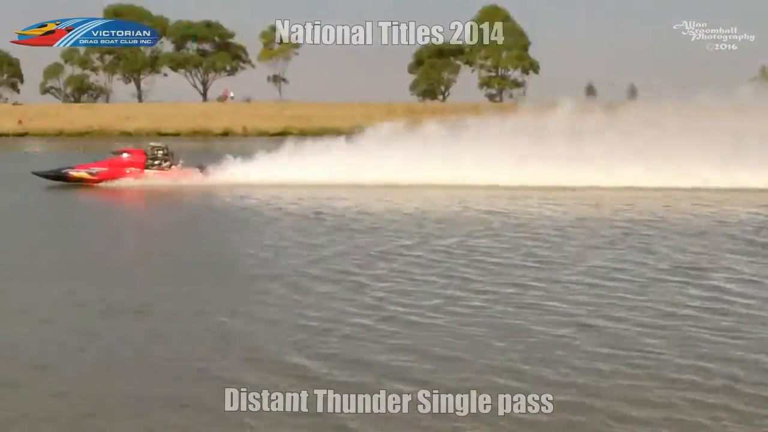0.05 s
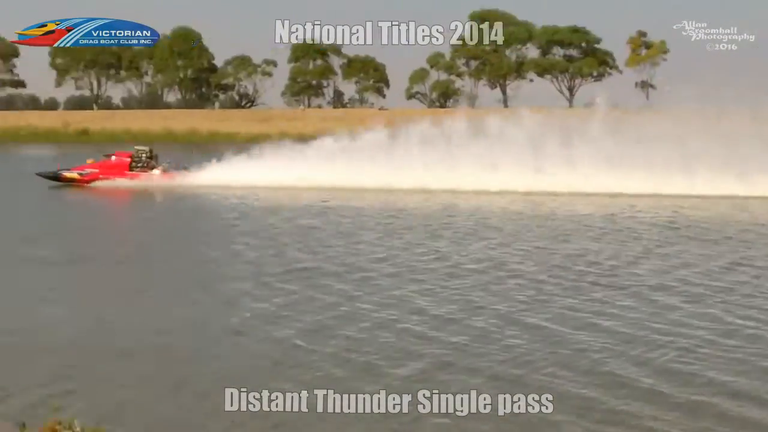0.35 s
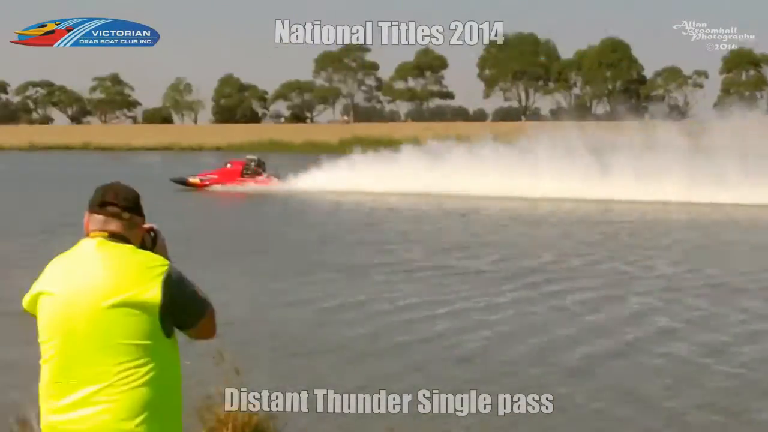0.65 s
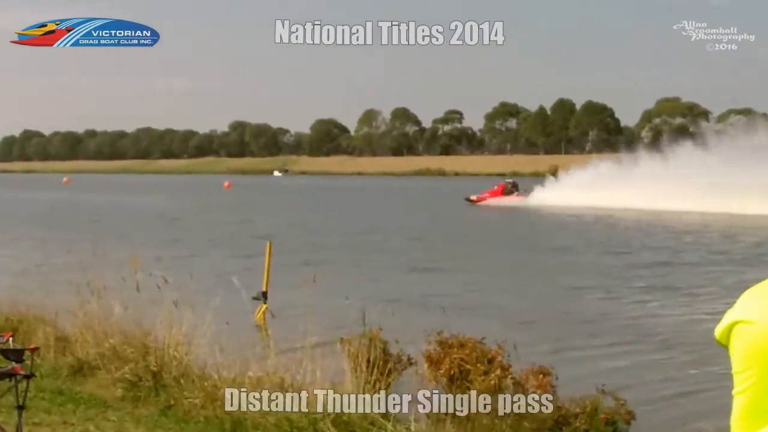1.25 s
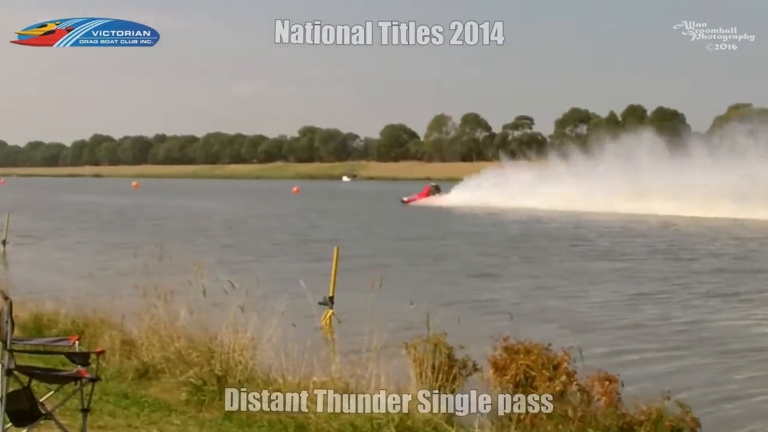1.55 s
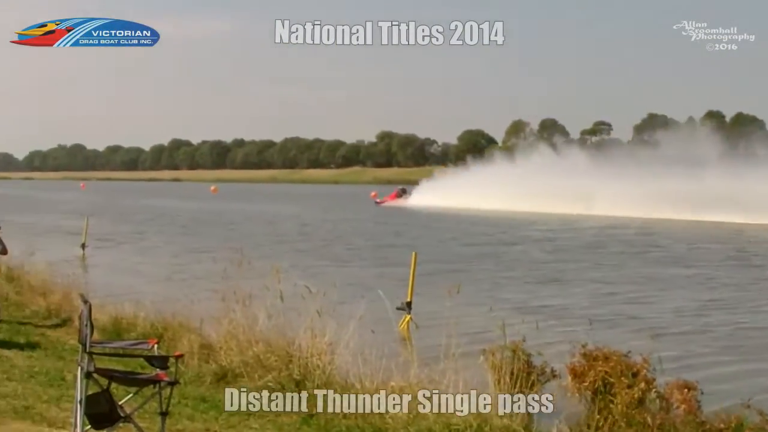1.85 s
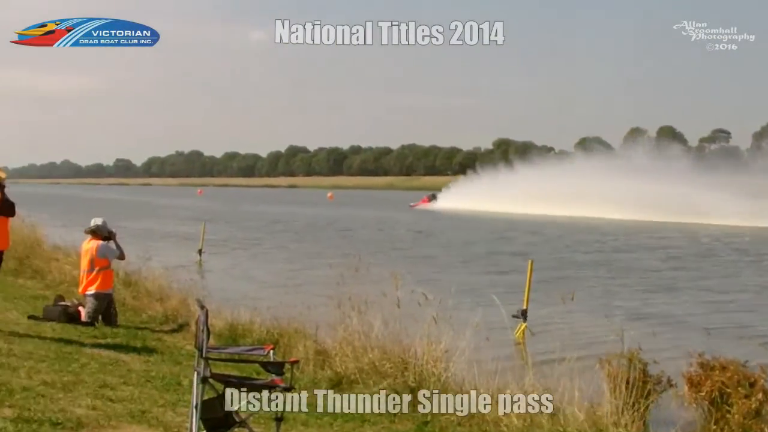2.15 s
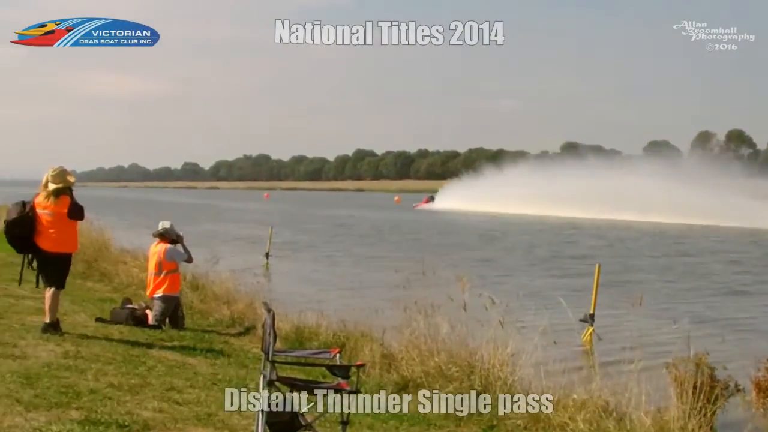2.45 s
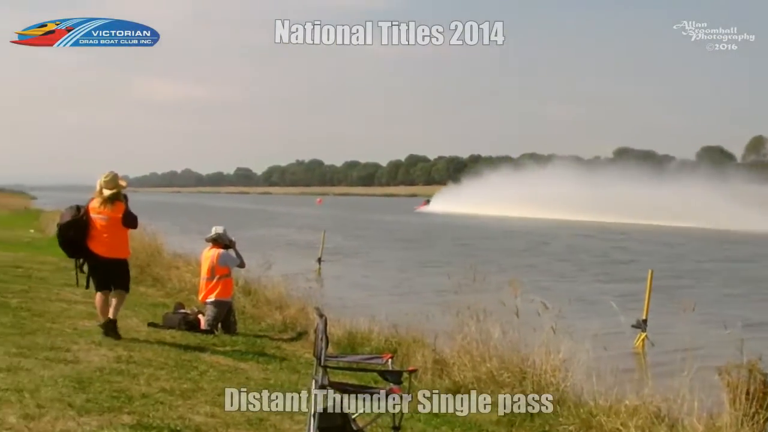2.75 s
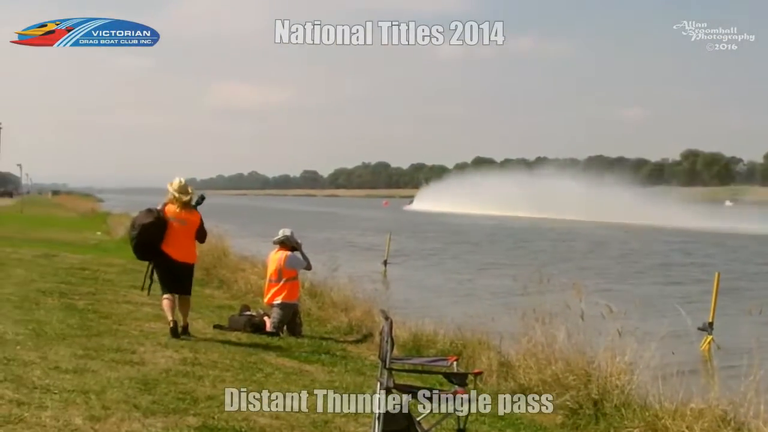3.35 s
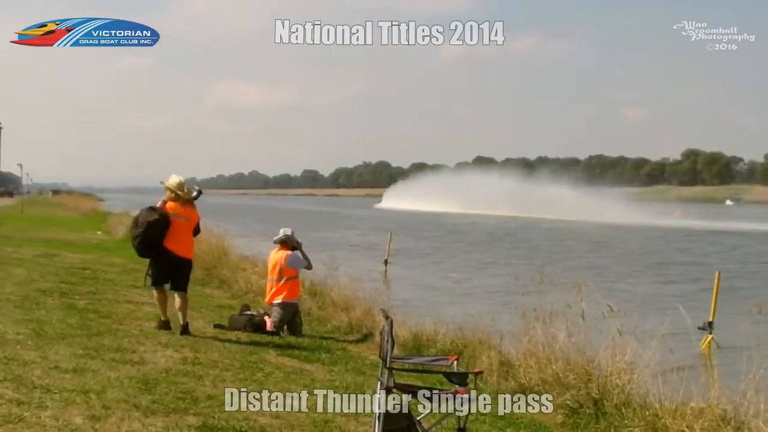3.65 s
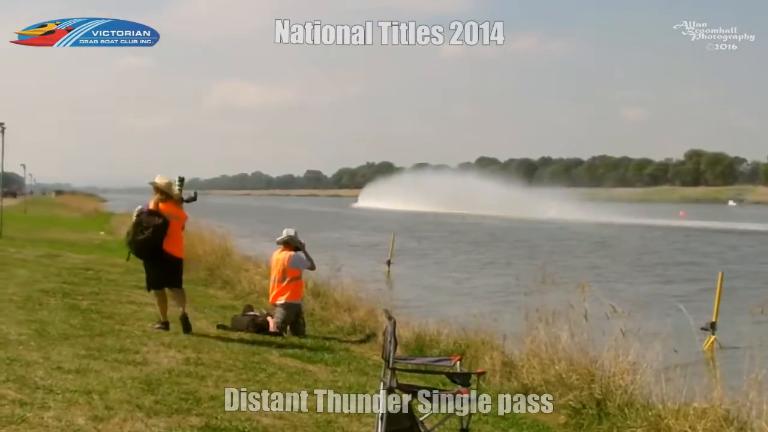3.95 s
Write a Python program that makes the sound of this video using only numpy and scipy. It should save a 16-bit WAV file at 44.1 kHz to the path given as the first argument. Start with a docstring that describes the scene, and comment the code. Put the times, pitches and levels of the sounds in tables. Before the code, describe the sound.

A racing boat's engine roars past at full throttle, its exhaust crackling over a steady hiss of spray. The firing turns ragged, the revs drop, and the sound dulls to a throb as it moves away across open water.

```python
"""A racing boat's V8 runs flat out along a wide waterway, over hissing spray and a faint rumble of air.
In each engine cycle the open exhausts fire four uneven shock pulses from the near cylinders and four
weak ones from the far side. Swirling gas trails each pulse, the shocks crackle and the shore echoes.
Around 1.5 s the firing turns ragged, and at 1.75 s the revs drop.
Then the boat draws away, and its crackle dulls to a throb."""
import sys
import numpy as np
from scipy import signal
from scipy.fft import rfft, irfft, next_fast_len
from scipy.io import wavfile
from scipy.ndimage import uniform_filter1d, minimum_filter1d, map_coordinates

SR = 44100
rng = np.random.default_rng(int(sys.argv[2]) if len(sys.argv) > 2 else 0)


def digitize_waveform(pressure):
    """Quantize a signal to 16-bit integers and store it at the path in sys.argv[1].

    Rows of a 2-D input are taken as channels; values are limited to [-1, 1].
    """
    field = np.atleast_2d(pressure).T
    bounded = np.clip(field, -1, 1)
    quanta = np.round(bounded * 32767).astype(np.int16)
    wavfile.write(sys.argv[1], SR, quanta)


N = 176400
T = np.arange(N) / SR
FFT_SIZE = next_fast_len(N + SR)
HZ = np.fft.rfftfreq(FFT_SIZE, 1 / SR)


def amp(db):
    """Turn decibels into a gain."""
    return 10 ** (np.asarray(db) / 20)

def unit(x):
    """Scale a sound to an average (rms) level of 1."""
    return x / np.sqrt(np.mean(x ** 2) + 1e-20)

def over_pitch(points, hz=HZ):
    """Join (frequency, value) points along a log frequency axis."""
    freqs, values = np.transpose(points)
    return np.interp(np.log(hz + 1), np.log(freqs + 1), values)

def over_time(points):
    """Join (time, value) points into one value per sample."""
    return np.interp(T, *np.transpose(points))

def ramp(t, at_s, length_s):
    """Rise from 0 to 1 around a moment."""
    return np.clip((t - at_s) / length_s + .5, 0, 1)

def wobble(per_s):
    """A smooth curve through per_s random values a second."""
    return map_coordinates(rng.standard_normal(int(T[-1] * per_s) + 4), [T * per_s])

def filtered(x, response):
    """Give each frequency of a sound its own gain."""
    return irfft(rfft(x, FFT_SIZE) * response, FFT_SIZE)[..., :N]

def below(hz, order=8):
    """A smooth filter that keeps what lies below hz."""
    return 1 / (1 + (HZ / hz) ** order)

def tone_filter(colour):
    """A filter of this colour that rings only after a pulse, never before (minimum phase)."""
    gain = np.maximum(amp(over_pitch(colour)), .0004)
    cepstrum = irfft(np.log(gain), FFT_SIZE)
    cepstrum[1:FFT_SIZE // 2] *= 2
    cepstrum[FFT_SIZE // 2 + 1:] = 0
    return np.exp(rfft(cepstrum))

def pulses(times, sizes):
    """Clean clicks that can fall between samples."""
    at = times[:, None] * SR
    taps = np.floor(at).astype(int) + np.arange(-7, 9)
    clicks = sizes[:, None] * np.sinc(taps - at) * np.sinc((taps - at) / 8)
    inside = (taps >= 0) & (taps < N)
    return np.bincount(taps[inside], clicks[inside], N)

def trail(train, decay_s):
    """A level that jumps at each pulse and dies away."""
    return np.abs(signal.lfilter([1], [1, -np.exp(-1 / (decay_s * SR))], train))

def steady_noise(colour, db):
    """Even noise with the given tone colour and level."""
    return amp(db) * unit(filtered(rng.standard_normal(N), amp(over_pitch(colour))))


# Tone colour of the hiss: (frequency [Hz], relative level [dB])
HISS_COLOUR = [(1500, -42), (4000, -6), (9000, 2), (12000, -4), (14000, -35)]

def microphone_hiss():
    """A thin, high hiss lies behind everything."""
    return steady_noise(HISS_COLOUR, db=-47.5)


# Tone colour of the air: (frequency [Hz], relative level [dB])
AIR_COLOUR = [(10, 1), (30, -6.5), (70, -6), (130, -4.5), (300, 3.5), (1000, -56)]

def air():
    """The air rumbles faintly."""
    return steady_noise(AIR_COLOUR, db=-39)


# Tone colour of the spray: (frequency [Hz], relative level [dB])
SPRAY_COLOUR = [(880, -50), (1500, 19), (3250, 11), (4310, 12), (4800, 10), (8540, 8.5), (13000, 0),
                (15500, -73)]

def spray():
    """Flying water hisses steadily."""
    return steady_noise(SPRAY_COLOUR, db=-39.5)


# How much the two ears differ: (frequency [Hz], gain of the scrambled copy [dB])
STEREO_WIDTH = [(100, -31), (600, -30.5), (1300, -46.5), (2000, -50), (4000, -54.5), (9500, -7.5),
                (13000, -23)]

def stereo_spread(centre):
    """A copy with scrambled phases widens the treble a little."""
    slices = signal.stft(centre, nperseg=256)[2]
    scrambled = slices * np.exp(2j * np.pi * rng.random(slices.shape))
    diffuse = signal.istft(scrambled, nperseg=256)[1][:N]
    return filtered(diffuse, amp(over_pitch(STEREO_WIDTH)))


# How long the shore echoes: (frequency [Hz], time to fade by 60 dB [s])
SHORE_DECAY = [(150, 0.26), (1000, 0.32), (10000, 0.15)]

def add_shore_echo(x, echo_db=-12.5):
    """Banks and trees send back a blurred echo that changes as the boat moves."""
    echo = np.zeros(N)
    moments = np.linspace(0, T[-1], 9)
    for weights in np.eye(len(moments)):  # each moment has its own echo, fading into the next
        hz, t, noise = signal.stft(rng.standard_normal(SR // 2), SR, nperseg=256)
        fade = amp(-60 * t / over_pitch(SHORE_DECAY, hz)[:, None])
        tail = signal.istft(noise * fade, SR, nperseg=256)[1]
        share = np.sqrt(np.interp(T, moments, weights))
        echo += signal.fftconvolve(x * share, tail / np.linalg.norm(tail))[:N]
    return x + amp(echo_db) * echo


# Two echoes from close by: (time [s], first delay [ms], second delay [ms])
CLOSE_DELAYS = [(0, 1.41, 1.5), (.3, 1.44, 1.53), (.7, 1.62, 1.7), (.95, 1.52, 1.62), (1.2, 1.15, 1.38),
                (1.45, .8, 1.25), (1.8, .64, 1.2), (2.3, .66, 1.25), (4, .58, 1.1)]

def add_close_echoes(x):
    """Two very short, shifting echoes boost some treble frequencies and cancel others."""
    treble = filtered(x, 1 - below(hz=1120))
    times, *delays = np.transpose(CLOSE_DELAYS)
    for gain, delay_ms in zip((0.15, -0.093), delays):
        earlier_s = T - np.interp(T, times, delay_ms) / 1000
        x = x + gain * map_coordinates(treble, [earlier_s * SR], order=5)
    return x


# Strength of the engine's deep tone: (time [s], relative level [dB])
THROB_LEVEL = [(0.0, -27), (0.92, -24.5), (1.0, -28.5), (2.06, -28), (2.51, -37), (2.57, -26),
               (3.98, -29.5), (4.0, -37)]

def throb(cycles, gain_db=-14.5):
    """The engine's lowest strong tone swings three times per cycle."""
    tone = unit(-np.sin(2 * np.pi * 3 * cycles))
    return amp(over_time(THROB_LEVEL) + gain_db) * tone


# Tones the pipes single out:
# (start [s], end [s], pitch [swings per engine cycle], level [dB], roughness [0 = smooth])
HOWL_TONES = [(0.42, 0.897, 16, -37.5, 0.8), (0.907, 1.26, 16, -37.5, 0.8), (1.636, 2.154, 8, -44.5, 0),
              (1.777, 2.15, 11, -44, .5), (2.55, 3.065, 23, -45, 1.2), (2.614, 3.103, 10, -41, 0.4),
              (3.186, 4.1, 11, -34.5, .45)]

def howls(cycles, fade_s=.1, waver_db=3.5):
    """Single engine tones swell out of the roar, most of them wavering in level and pitch."""
    out = np.zeros(N)
    for start, end, harmonic, db, roughness in HOWL_TONES:
        fade = ramp(T, start, fade_s) * (1 - ramp(T, end, fade_s))
        phase = 2 * np.pi * harmonic * cycles + roughness * wobble(per_s=55)
        level = amp(db + roughness * waver_db * wobble(per_s=55))
        out += fade * level * unit(np.cos(phase))
    return out


# Where the run's five stretches (alongside, passing, revs dropping, leaving, distant) meet: (time [s])
STRETCH_BORDERS = [0.372, 1.6, 2.38, 2.98]

def stretch_shares(blend_s=0.18):
    """How much of each stretch is heard at each moment; one blends into the next."""
    begun = [ramp(T, border, blend_s) for border in STRETCH_BORDERS]
    return -np.diff([np.ones(N), *begun, np.zeros(N)], axis=0)


# Strength of the gas, one value per stretch: (level against the pulses [dB])
GAS_LEVELS = [2, -1.5, -3.5, -3.5, -2.5]

def swirling_gas(train, shares):
    """A short puff of turbulent gas follows each exhaust pulse."""
    puffs = trail(train, decay_s=0.0053) * rng.standard_normal(N)
    gas = unit(filtered(puffs, 1 - below(hz=314, order=4)))
    return (amp(GAS_LEVELS) @ shares) * gas


# Strength of the fizz, one value per stretch: (level against the shock fronts [dB])
FIZZ_LEVELS = [18, 9, 1, 0.5, 1.5]

def crackle(times, sizes, train, shares, sparks_per_s=700):
    """Steep shock fronts, with small shocks and fizz in the jet behind; distance fades the fizz first."""
    scatter = amp(db=2 * rng.standard_normal(len(times)))
    fronts = pulses(times, sizes ** 1.5 * scatter)  # strong firings steepen, so they stand out more
    jet = trail(train, decay_s=0.0062)
    sparks = jet * (rng.random(N) < sparks_per_s / SR) * rng.exponential(size=N)
    fizz = unit(jet * rng.standard_normal(N)) + amp(db=-3) * unit(sparks)
    return unit(fronts) + (amp(FIZZ_LEVELS) @ shares) * fizz


# Notes the pipes ring at: (frequency [Hz], width [Hz], then a strength for each stretch [dB])
PIPE_NOTES = [(460, 23, -14, -7, -8, -17, -15), (842, 61, -20, -15, -10, -30, -22),
              (830, 54, -9, -30, -30, -1, -31)]

def pipe_ringing(stretch):
    """A filter for the ringing of the exhaust pipes, as heard on one stretch."""
    return 1 + sum(amp(db[stretch]) * 1j * HZ * width / (note ** 2 - HZ ** 2 + 1j * HZ * width)
                   for note, width, *db in PIPE_NOTES)


# How fast the engine runs: (time [s], speed [cycles per second])
ENGINE_SPEED = [(0.0, 47.89), (0.2, 49.97), (0.36, 48.98), (0.5, 50.17), (0.7, 49.05), (0.9, 48.63),
                (1.05, 48.15), (1.18, 48.14), (1.35, 46.05), (1.55, 46.08), (1.7, 46.84), (1.8, 37.24),
                (2.07, 36.29), (2.22, 37.54), (2.42, 36.09), (2.56, 37.18), (2.75, 36.7), (3.05, 37.19),
                (3.4, 37.58), (3.58, 38.66), (3.82, 37.75), (4.0, 38.16)]

def engine_cycles(start_cycle=.222):
    """Count the engine's cycles; every cylinder fires once in each."""
    return start_cycle + np.cumsum(over_time(ENGINE_SPEED)) / SR


# When each cylinder fires, near four first: (place at full revs [cycles], place at low revs [cycles])
FIRING_PLACES = [(.002, .002), (.246, .289), (.373, .381), (.627, .645), (.13, .174), (.53, .577),
                 (.78, .834), (.9, .958)]
# How hard each one fires: (relative level at full revs [dB], relative level at low revs [dB])
FIRING_LEVELS = [(3, 4.5), (0, 3.5), (-0.5, 4.5), (-2, 0), (-9.5, -13), (-15.5, -6), (-28.5, -11.5),
                 (-18.5, -8.5)]
# Firings with a set accent, nearly all snapping above the rest: (time [s], extra level [dB])
ACCENTS = [(1.06, 6), (1.421, 5), (1.464, 4), (1.66, 6), (1.722, 6), (1.768, 2.5), (1.852, 0.5),
           (2.125, 2.5), (2.548, 1), (2.576, 3.5), (2.63, 3.5), (2.711, 2), (2.738, 5.5), (2.749, 4),
           (2.774, 5.5), (2.793, 4.5), (2.801, -3), (2.883, 3), (3.207, 2.5), (3.231, 1.5), (3.287, 2.5),
           (3.312, 1), (3.34, 2.5), (3.367, 5.5), (3.401, 7), (3.5, 5), (3.552, 5.5), (3.629, 4),
           (3.681, 1), (3.708, 2.5), (3.813, 4), (3.867, 8), (3.946, 2), (3.971, 2.5)]

def firings(cycles, misfire_chance=.025, misfire_db=-8):
    """Times and strengths of the eight cylinders' firings, no two quite alike."""
    cycle = np.arange(int(cycles[-1]) + 1)[:, None]
    slowed = ramp(np.interp(cycle, cycles, T), at_s=1.75, length_s=.1)  # the revs drop
    fast_place, slow_place = np.transpose(FIRING_PLACES)
    fast_db, slow_db = np.transpose(FIRING_LEVELS)
    places = cycle + (1 - slowed) * fast_place + slowed * slow_place
    times = np.interp(places, cycles, T, left=-1, right=-1)
    db = 1.2 * rng.standard_normal(times.shape)  # single firings vary
    db += .6 * rng.standard_normal(cycle.shape)  # so do whole cycles
    db += misfire_db * (rng.random(times.shape) < misfire_chance)
    for at_s, extra_db in ACCENTS:
        nearness = np.exp(-((times - at_s) / .004) ** 2)
        db += nearness * (extra_db - db)
    db += (1 - slowed) * fast_db + slowed * slow_db
    ragged = np.exp(-((times - 1.5) / .2) ** 2)  # timing loosens just before the revs drop
    jitter_s = (.00009 + .00016 * ragged) * rng.standard_normal(times.shape)
    return (times + jitter_s).ravel(), amp(db).ravel()


# Tone colour of the exhaust on each stretch: (frequency [Hz], relative level [dB])
ALONGSIDE_COLOUR = [(41, -52), (70, -24), (112, -9), (144, -37), (176, -21), (241, -14.5), (361, -12.5),
                    (386, -15), (494, -6), (565, -11.5), (618, -4), (723, -6), (1060, 0), (1240, -13),
                    (1480, 1.5), (2380, -13), (3050, -15.5), (9150, -16), (15000, -28.5)]
PASSING_COLOUR = [(41, -60), (70, -26), (112, -31), (126, -27.5), (144, -30), (210, -10), (246, -14),
                  (315, -15.5), (386, -13), (422, -11.5), (791, -5.5), (947, -11.5), (1060, -8.5),
                  (2220, -17.5), (2720, -16.5), (5970, -23.5), (9360, -19), (15000, -32)]
REV_DROP_COLOUR = [(41, -50), (70, -20), (112, -24.5), (150, -16), (164, -8), (188, -9), (258, -13.5),
                   (288, -1.5), (337, -10), (403, -7.5), (472, -10), (517, -5), (553, -11.5), (791, -6.5),
                   (1210, -11), (1330, -15), (1780, -7.5), (2430, -18.5), (2910, -17.5), (3800, -20.5),
                   (5500, -27), (9360, -24), (15000, -36)]
LEAVING_COLOUR = [(41, -55), (70, -31), (112, -18), (148, -5), (185, -6), (296, -1.5), (407, -3), (540, -1),
                  (630, -6), (740, -4), (866, 0), (969, -1.5), (1260, -6.5), (1450, -15), (1740, -11.5),
                  (2490, -21.5), (2910, -22), (3730, -24), (4170, -29), (4560, -34), (8750, -34.5),
                  (15000, -51)]
DISTANT_COLOUR = [(41, -53), (70, -32), (112, -16.5), (150, -6), (185, -4), (230, 0.5), (296, -2.5),
                  (345, -0.5), (413, -3.5), (530, -6), (605, -11.5), (780, -10.5), (969, -11), (1060, -16),
                  (1280, -16.5), (1620, -30), (1860, -23.5), (2910, -24), (3260, -20), (6110, -26.5),
                  (10500, -31.5), (15000, -66)]
# How four bands of the exhaust rise and fall, lowest first: (time [s], relative level [dB])
BASS_LEVEL = [(0.0, -23.5), (0.11, -25.5), (0.17, -23), (0.24, -27.5), (0.38, -24.5), (0.81, -30),
              (1.61, -32), (1.66, -26.5), (1.89, -25), (2.23, -32), (2.58, -23), (3.41, -22.5),
              (3.43, -24.5), (4.0, -23.5)]
MIDDLE_LEVEL = [(0, -20), (.09, -25), (.16, -17.5), (.24, -23.5), (.3, -21.5), (.48, -18.5), (.65, -18.5),
                (.78, -21.5), (.88, -17.5), (.95, -25.5), (1.3, -27.5), (1.58, -30), (1.72, -22.5),
                (1.94, -22), (2.23, -29), (2.55, -24), (2.64, -20.5), (2.77, -22.5), (3.38, -24),
                (3.47, -28.5), (4, -33.5)]
UPPER_MIDDLE_LEVEL = [(0.0, -21.5), (0.09, -30.5), (0.15, -31.5), (0.22, -30.5), (0.37, -26.5),
                      (1.37, -34.5), (1.59, -33.5), (1.86, -27.5), (2.15, -38), (2.38, -28.5), (2.41, -42),
                      (2.42, -27), (2.74, -31), (2.75, -29.5), (2.84, -33), (3.4, -40.5), (3.41, -44),
                      (4.0, -57)]
TREBLE_LEVEL = [(0.0, -14.5), (0.09, -22.5), (0.15, -19), (0.25, -23.5), (0.3, -23), (0.39, -19.5),
                (0.42, -25.5), (0.47, -18), (0.54, -24.5), (0.61, -20.5), (0.71, -24), (2.03, -29),
                (2.14, -26.5), (2.43, -32.5), (2.8, -38.5), (2.87, -42), (3.31, -37.5), (3.42, -46),
                (4.0, -48.5)]

def exhaust(cycles):
    """Pulses and gas roar below, shocks crackle on top; angle and distance colour them all."""
    times, sizes = firings(cycles)
    train = pulses(times, sizes)
    shares = stretch_shares()
    roar = add_shore_echo(unit(train) + swirling_gas(train, shares))
    shocks = add_shore_echo(crackle(times, sizes, train, shares))
    band_edges = [np.zeros_like(HZ), below(hz=600), below(hz=1400), below(hz=2400), np.ones_like(HZ)]
    spectra = rfft([roar, roar, roar, shocks], FFT_SIZE) * np.diff(band_edges, axis=0)
    levels = amp([over_time(BASS_LEVEL) + 2, over_time(MIDDLE_LEVEL) - 2.37,
                  over_time(UPPER_MIDDLE_LEVEL) + 0.27, over_time(TREBLE_LEVEL) + 0.7])
    colours = ALONGSIDE_COLOUR, PASSING_COLOUR, REV_DROP_COLOUR, LEAVING_COLOUR, DISTANT_COLOUR
    out = np.zeros(N)
    for stretch, (colour, share) in enumerate(zip(colours, shares)):
        bands = irfft(spectra * tone_filter(colour) * pipe_ringing(stretch), FFT_SIZE)[:, :N]
        rms = np.sqrt(np.average(bands ** 2, axis=1, weights=share))[:, None]
        out += share * (levels * bands / rms).sum(axis=0)
    return out


def scene():
    """Boat, spray and air sit in the centre; only the treble spreads a little."""
    cycles = engine_cycles()
    engine = add_close_echoes(exhaust(cycles)) + throb(cycles) + howls(cycles)
    centre = engine + spray() + air()
    side = stereo_spread(centre) + microphone_hiss()
    return np.array([centre + side, centre - side])

def record(dry):
    """Turn down the highest peaks for an instant and cut off the very top of the treble."""
    ceiling, span_s, top_hz = .92, .002, 15600
    span = int(span_s * SR)
    needed_gain = ceiling / np.maximum(np.abs(dry).max(axis=0), ceiling)
    smooth_gain = uniform_filter1d(minimum_filter1d(needed_gain, span), span)
    return filtered(dry * smooth_gain, HZ < top_hz)


dry = scene()
out = record(dry)
digitize_waveform(out)
```